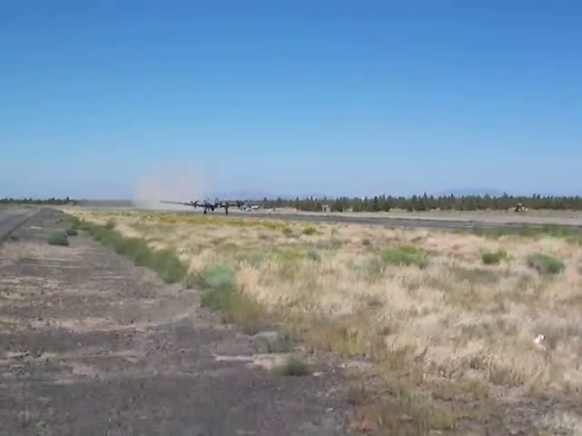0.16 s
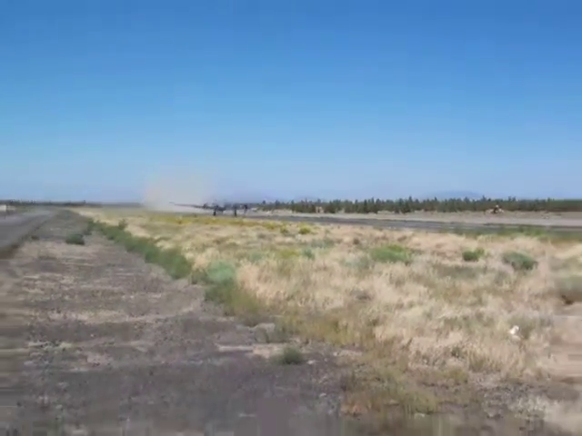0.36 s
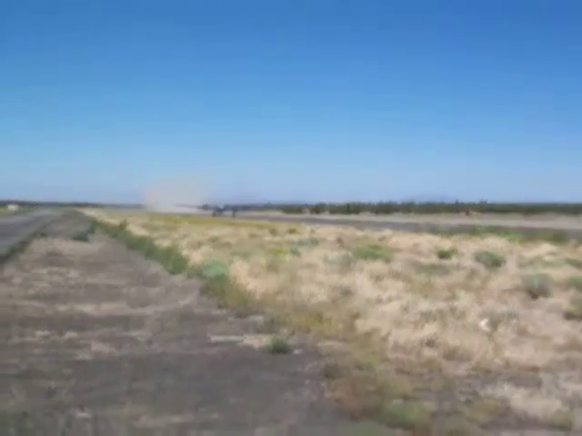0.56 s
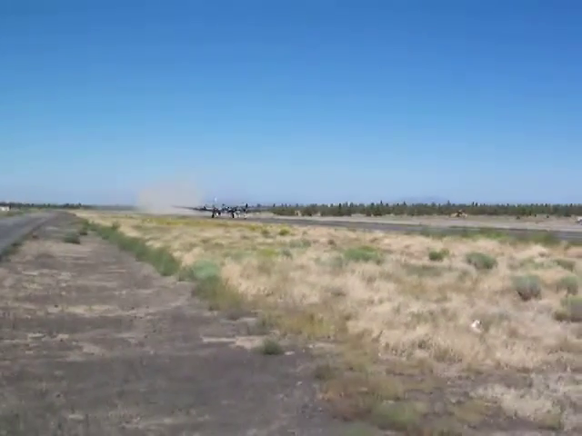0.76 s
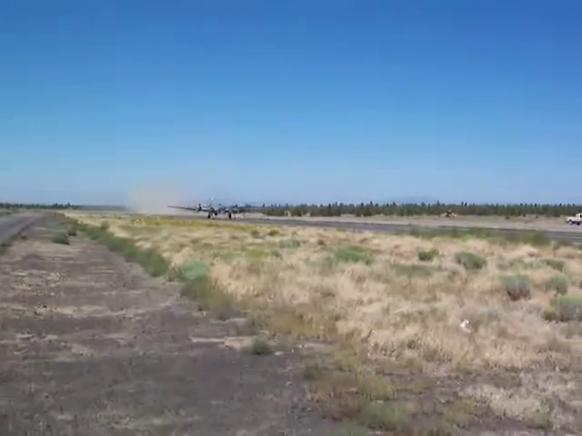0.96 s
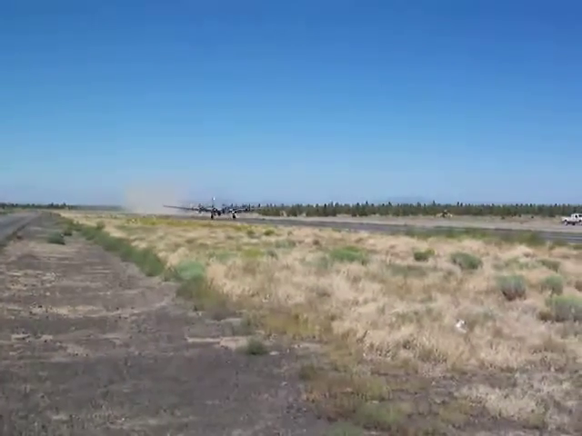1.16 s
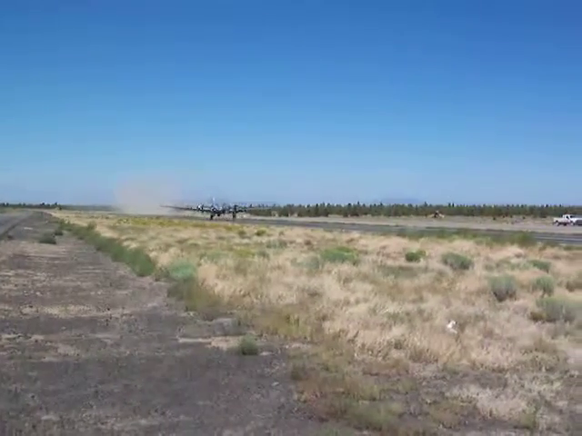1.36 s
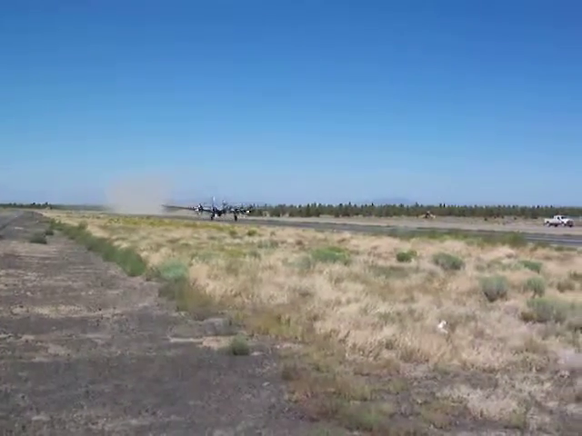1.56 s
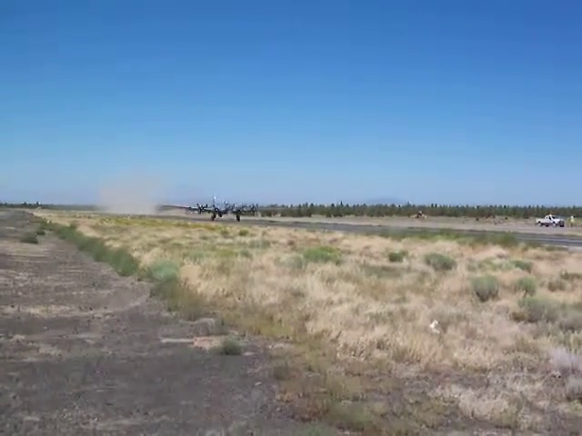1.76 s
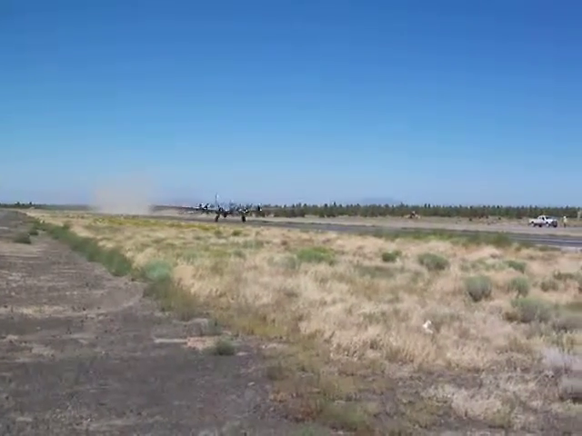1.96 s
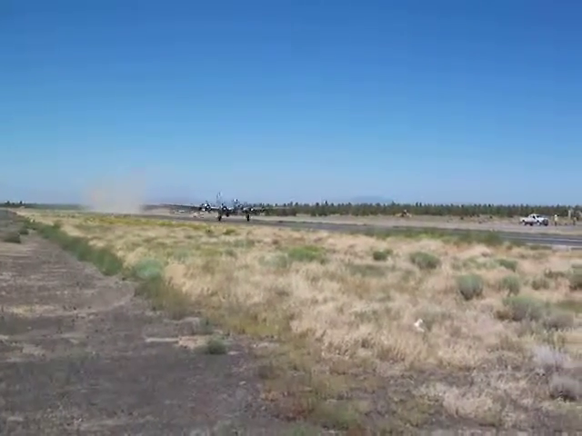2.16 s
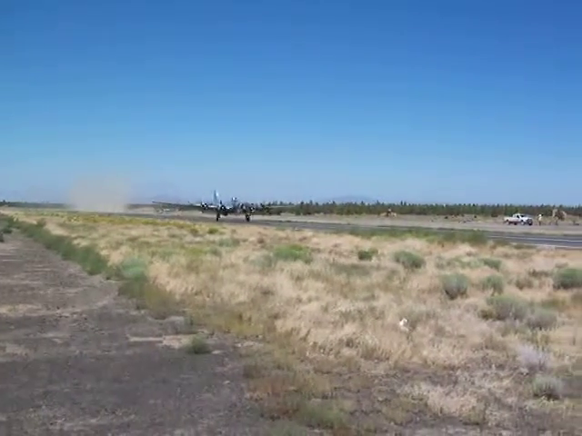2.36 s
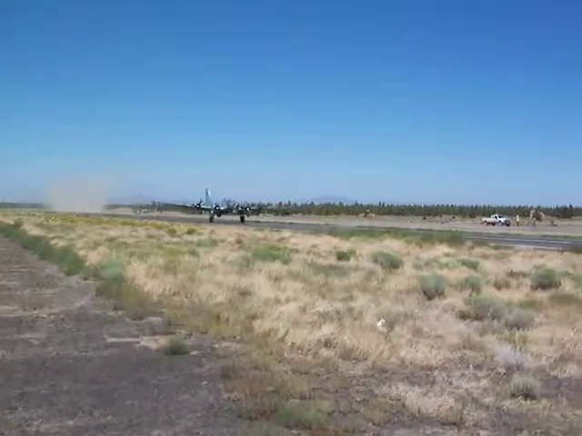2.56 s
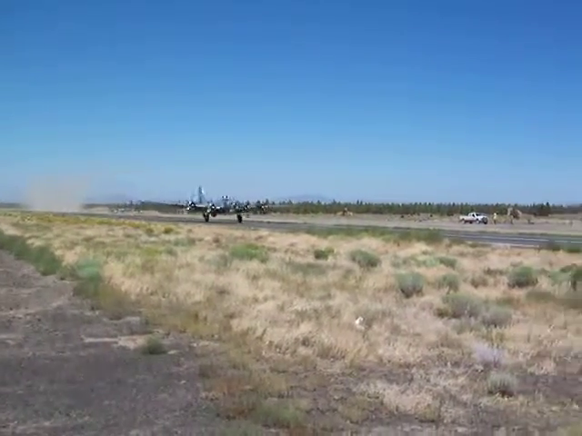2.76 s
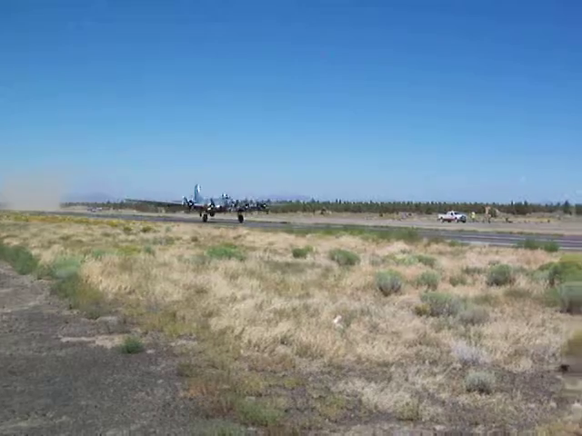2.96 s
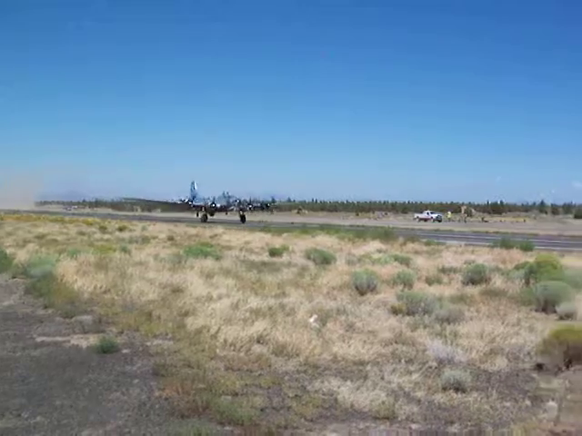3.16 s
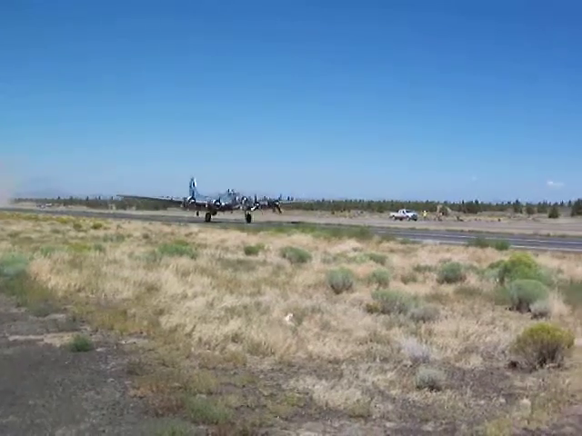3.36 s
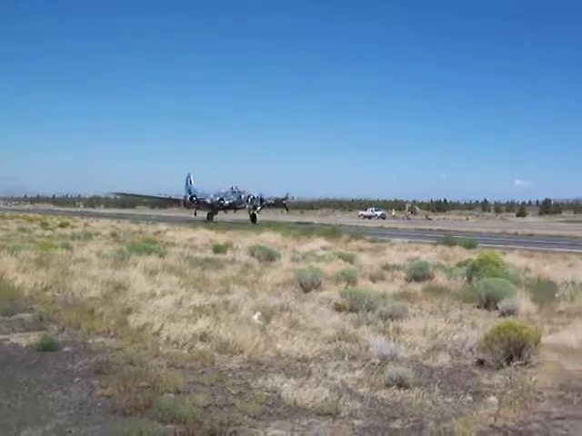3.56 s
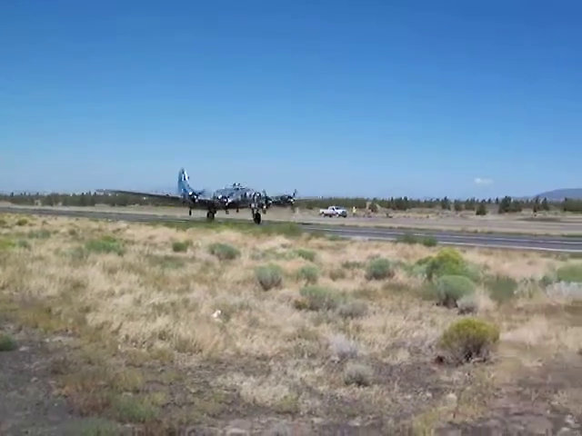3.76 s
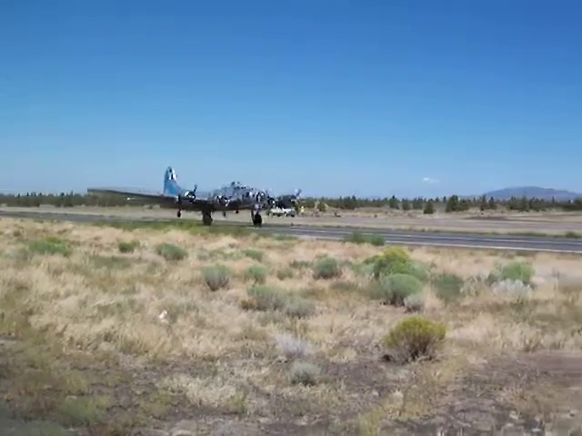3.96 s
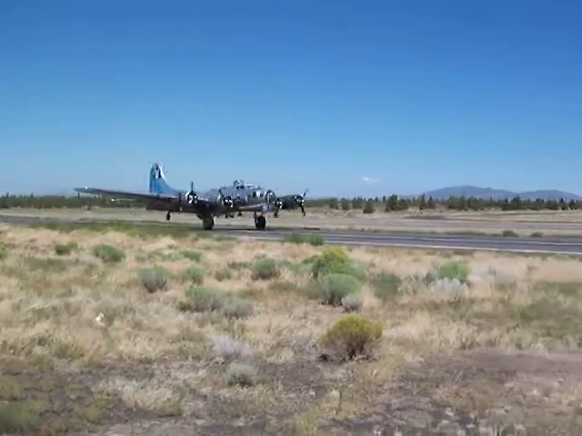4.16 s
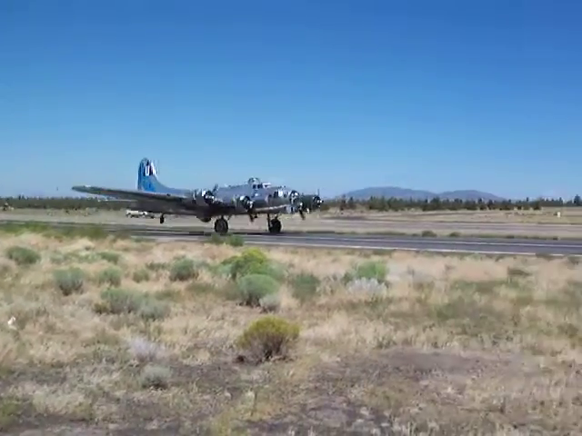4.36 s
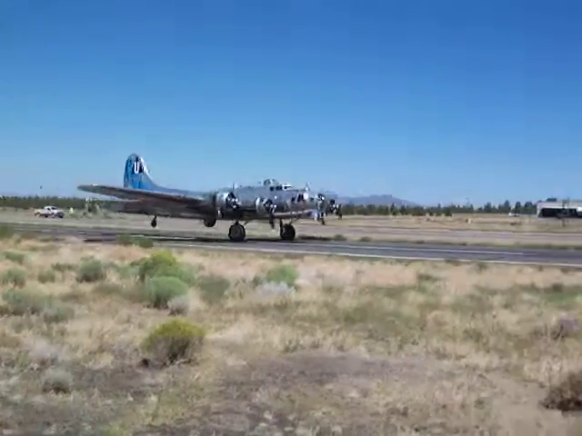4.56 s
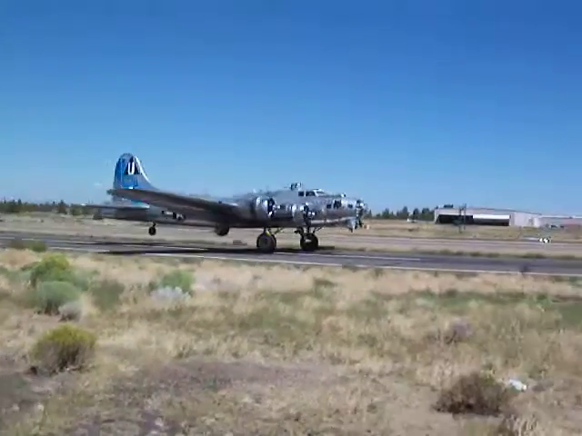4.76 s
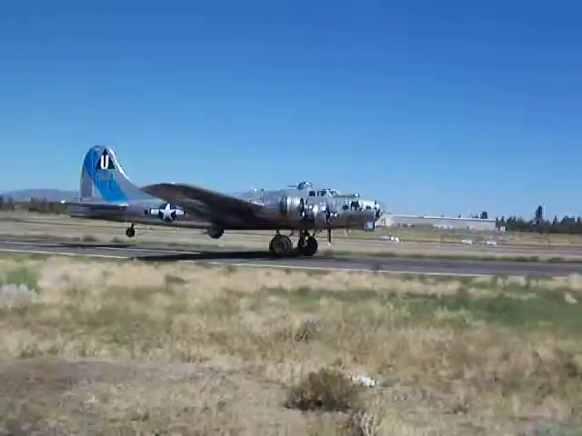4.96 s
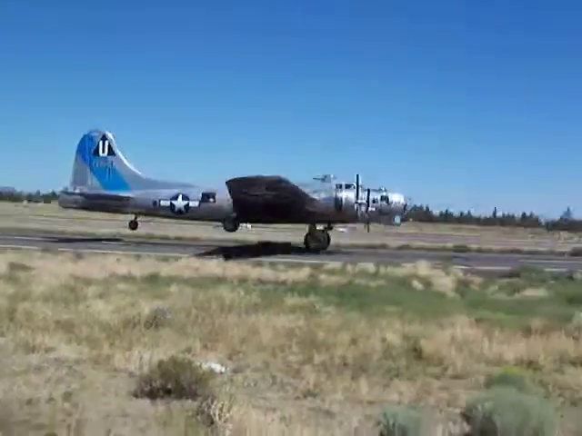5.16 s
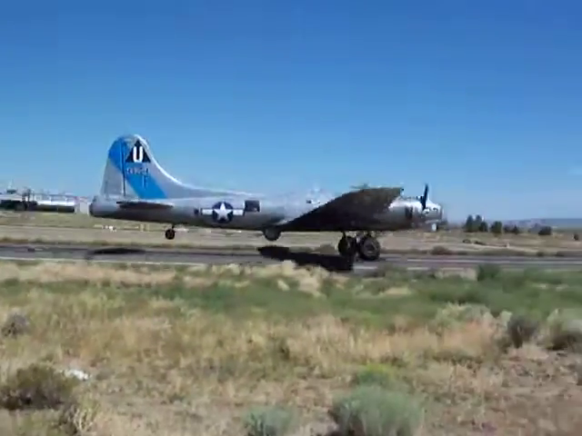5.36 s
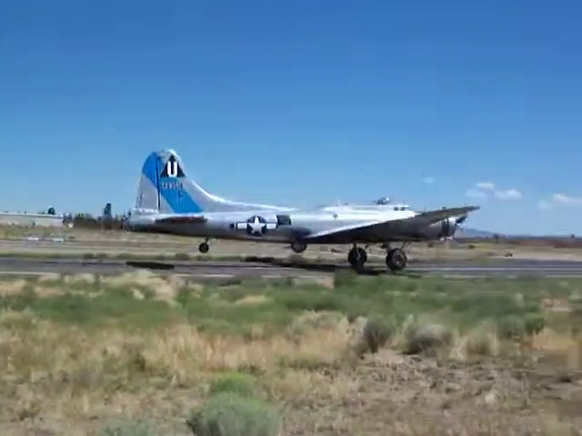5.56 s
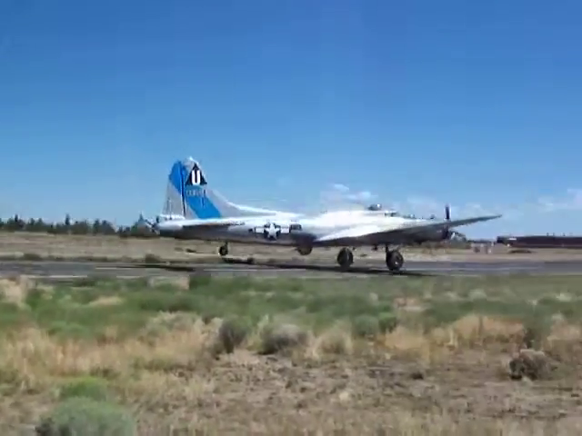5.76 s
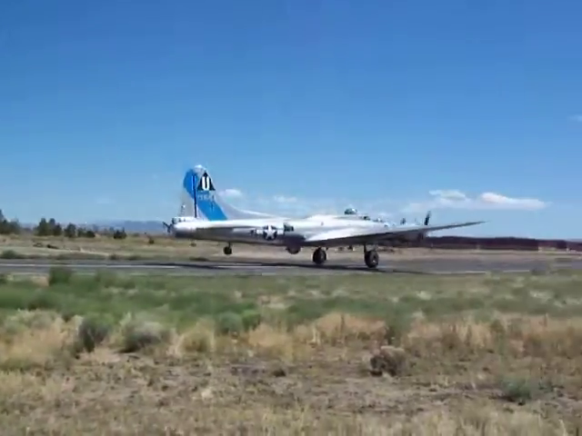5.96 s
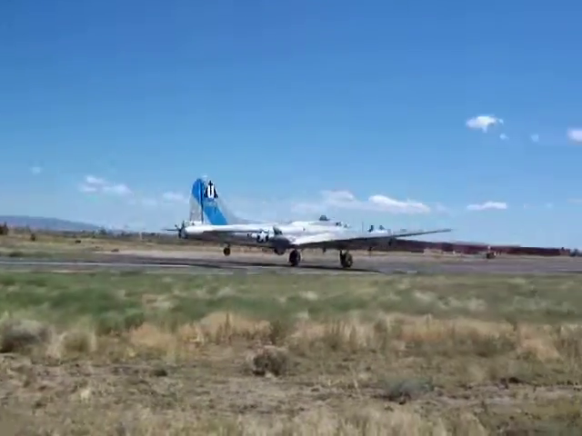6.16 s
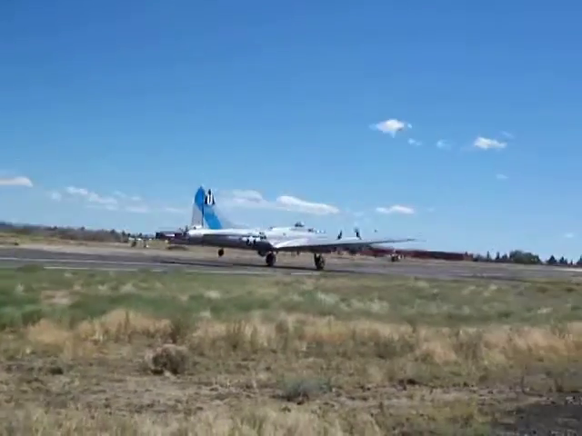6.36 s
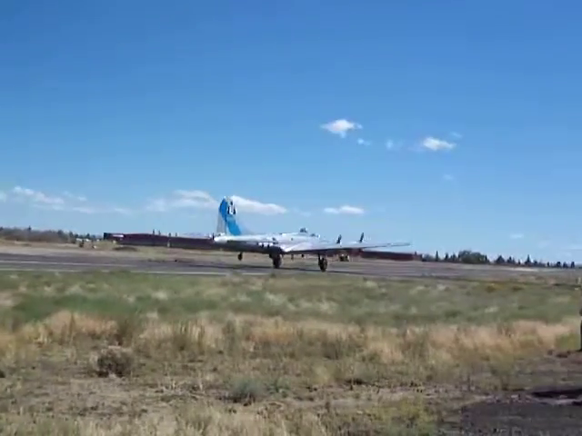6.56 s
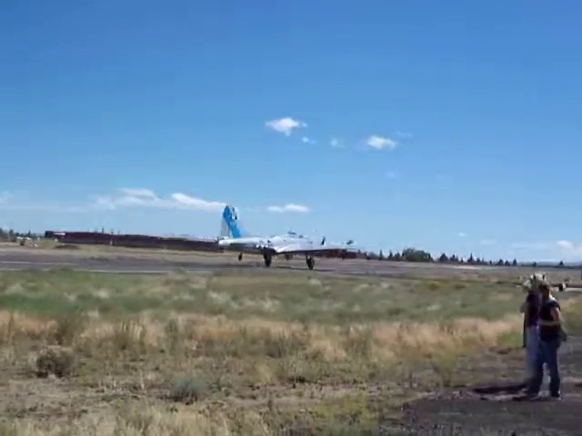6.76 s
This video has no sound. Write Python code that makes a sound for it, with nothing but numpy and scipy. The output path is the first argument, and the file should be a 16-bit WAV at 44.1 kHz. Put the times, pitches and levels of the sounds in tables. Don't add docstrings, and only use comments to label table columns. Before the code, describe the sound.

Wind buffets a small microphone while a four-engine propeller plane drones nearer on a runway, roars past close, pops its exhaust and recedes, pitch dropping.

```python
import sys
import numpy as np
from scipy import signal
from scipy.fft import rfft, irfft, next_fast_len
from scipy.io import wavfile
from scipy.ndimage import uniform_filter1d, map_coordinates

SR = 44100
rng = np.random.default_rng(int(sys.argv[2]) if len(sys.argv) > 2 else 0)


def dump_mix(stems):
    frames = np.atleast_2d(stems).T
    limited = np.clip(frames, -1, 1)
    pcm = np.round(limited * 32767).astype(np.int16)
    wavfile.write(sys.argv[1], SR, pcm)


def amplitude_ratio(level_db):
    exponent = np.asarray(level_db, float) / 20
    return 10 ** exponent


N = 300042
T = np.arange(N) / SR
COARSE = T[::32]

# start in seconds, peak in dB, sharpness in dB.
SNAPS = [(.034, -17.5, -16.5), (0.095, -16, -22.5), (.161, -20, -12.5), (.244, -19, -14),
         (0.291, -24, -13.5), (0.364, -20, -19), (.407, -16, -17), (.832, -20.5, -24), (.896, -23, -13),
         (1.203, -16, -19), (1.265, -13, -17), (1.393, -12, -16.5), (1.494, -26, -18), (1.629, -11, -22.5),
         (1.751, -18.5, -18), (1.785, -12, -23.5), (1.814, -16, -19), (1.896, -8, -20.5),
         (2.035, -12, -20.5), (2.1, -8, -25), (2.201, -17, -17), (2.222, -15, -16.5), (2.287, -9.5, -13),
         (2.844, -17, -12), (2.719, -12, -19.5), (2.745, -12.5, -11), (2.771, -15, -22),
         (3.019, -15.5, -21), (3.193, -9, -14.5), (3.286, -9, -33)]


def unit(x):
    return x / np.sqrt(np.mean(x ** 2) + 1e-20)


def curves(rows):
    s, *cols = np.transpose(rows)
    return [np.interp(T, s, c) for c in cols]


def swells(rows):
    gain = sum(amplitude_ratio(db) * np.exp(-np.abs((COARSE - s) / half) ** 3) for s, db, half in rows)
    return np.interp(T, COARSE, gain)


def wobble(rate):
    return map_coordinates(rng.standard_normal(int(N * rate / SR) + 4), [T * rate])


def filtered(x, response):
    m = next_fast_len(N + 8192)
    return irfft(rfft(x, m) * response(np.fft.rfftfreq(m, 1 / SR) + 1), m)[..., :N]


def coloured(x, spectrum):
    f, db = np.transpose(spectrum)
    return filtered(x, lambda hz: amplitude_ratio(np.interp(np.log(hz), np.log(f), db)))


def evened(x, size):
    power = np.abs(uniform_filter1d(x ** 2, size=size))
    return unit(x / np.sqrt(power + 1e-9 * np.mean(x ** 2)))


def patchy(patchy_db):
    z = signal.stft(rng.standard_normal(N), nperseg=512)[2]
    field = uniform_filter1d(uniform_filter1d(rng.standard_normal(z.shape), 6, 0), 10, 1)
    return signal.istft(z * amplitude_ratio(patchy_db * unit(field)), nperseg=512)[1][:N]


def tone(turns):
    return np.sqrt(2) * np.sin(2 * np.pi * (turns + rng.random()))


def wind():
    # time in seconds, level in dB.
    gusts = [(0, -31.5), (.25, -35), (.65, -35), (.93, -30), (1.2, -29), (1.46, -27), (1.65, -27),
             (2.25, -25.5), (2.45, -24.5), (2.54, -32.5), (2.75, -26.5), (3.35, -25), (4.26, -31),
             (4.35, -41), (5.1, -40), (5.87, -35.5), (6.19, -29.5), (6.8, -57.5)]
    # time in seconds, gain in dB.
    shelter = [(0, 0), (2.42, -1), (2.5, -6), (3.5, -7), (3.6, -17.5), (3.85, -4.5), (4.4, -7), (4.6, -12),
               (6.8, -20.5)]
    # frequency in Hz, density in dB per Hz.
    buffet_spectrum = [(12, -21), (24, 8.5), (50, 4.5), (90, -2), (170, -6), (300, -18), (600, -64)]
    # frequency in Hz, gain in dB.
    port = [(40, -22), (120, -5.5), (300, 2), (900, -5.5), (1400, -15), (2000, -18), (3000, -24),
            (5000, -58.5)]
    # centre in seconds, peak in dB, half length in seconds.
    lumps = [(1.3, -23.5, 0.16), (1.62, -23.5, 0.019), (2.08, -20.5, 0.021), (2.32, -18, 0.051),
             (2.6, -18.5, 0.043), (2.69, -16, 0.017), (3.05, -23, 0.19), (3.28, -18.5, 0.041)]
    # centre in seconds, peak over the strength in dB, half length in seconds.
    flurry_rows = [(.05, -1.5, 0.071), (.48, 1.5, 0.095), (.72, 1, 0.053), (.83, -0.5, 0.063),
                   (1.16, 0.5, 0.034), (1.27, -12, 0.0086), (1.54, -4, 0.022), (1.86, 1, 0.035),
                   (2.1, -7, 0.025), (2.26, -14, 0.026), (2.43, -5, 0.0067), (2.61, 0, 0.017),
                   (2.75, -0.5, 0.039), (2.85, -4, 0.033), (3.2, 0.5, 0.019), (3.3, 0, 0.021),
                   (3.43, 0, 0.018)]
    # centre in seconds, share removed in dB, half length in seconds.
    calms = [
        (.875, -4, 0.011),
        (1.475, 0, 0.021),
    ]
    # rise in seconds, rate per second, level in dB.
    eddy_sizes = [
        (.00018, 480, -2),
        (.0005, 190, -7),
        (.0013, 220, 3),
    ]
    flutter_db, thud_db = -2.5, 2.5
    thuds_follow = 0.25

    strength_db, = curves(gusts)
    shelter_db, = curves(shelter)
    base, flurries = amplitude_ratio(shelter_db), swells(flurry_rows)
    exposed = np.clip(1 - swells(calms), 0, 1)
    buffet = evened(coloured(rng.standard_normal(N), buffet_spectrum), size=6000)

    bunches = amplitude_ratio(3.1 * wobble(90))
    pushes = []
    for rise, rate, db in eddy_sizes:
        hits = (rng.random(N) < rate / SR) * rng.laplace(size=N) * bunches
        pushes.append(filtered(hits, lambda hz: amplitude_ratio(db) / rise / (1 + 2j * np.pi * hz * rise) ** 2))
    small, medium, large = pushes
    flutter = evened(coloured(small + medium, port), size=3500)
    thuds = evened(coloured(large, port), size=4000)

    low = (amplitude_ratio(strength_db + 2.0) + swells(lumps)) * buffet
    fluttering = amplitude_ratio(flutter_db) * (base + flurries) * lulls() * flutter
    thudding = amplitude_ratio(thud_db) * (base + thuds_follow * flurries) * thuds
    return low + amplitude_ratio(strength_db) * exposed * (fluttering + thudding) + snaps()


def lulls():
    db = 0
    for s, *_ in SNAPS:
        follow = 2.0 * np.exp(-((COARSE - s - .008) / .012) ** 2)
        gather = 9 * np.exp(-((COARSE - s + 0.011) / .004) ** 2)
        db = db + follow - gather
    return np.interp(T, COARSE, amplitude_ratio(db))


def snaps():
    # start in seconds, peak in dB.
    ticks = [
        (0.0503, -31),
        (0.0953, -56),
    ]
    out, t = np.zeros(N + SR), np.arange(500) / SR
    draws = rng.random((len(SNAPS), 3))
    for (s, db, sharp_db), (a, b, c) in zip(SNAPS, draws):
        hz = 750 * amplitude_ratio(.5 * (sharp_db + 16.0)) * (0.94 + 0.35 * a)
        u = t * hz / (0.18 + 0.36 * b)
        swing = u ** 2 * np.exp(-u) * np.sin(2 * np.pi * hz * t / (1 + 150 * t))
        out[round(s * SR) + 30:][:len(t)] += amplitude_ratio(db + 7.0) * np.sign(c - .5) * swing
    out = filtered(out[:N], lambda hz: 1 / (1 + (hz / 2100) ** 5))
    for s, db in ticks:
        out[round(s * SR) + 40:][:2] += amplitude_ratio(db + 23) * np.array([1, -.6])
    return out


def flight():
    blade_hz, speed_m_s, nearest_m, pass_s = 71.3, 46.0, 31.0, 5.2
    sound_m_s = 343
    along = speed_m_s * (T - pass_s)
    metres = np.hypot(along, nearest_m)
    aft = along / metres
    turns = np.cumsum(blade_hz / (1 + aft * speed_m_s / sound_m_s)) / SR
    return metres, 20 * np.log10(nearest_m / metres), aft, turns


def propellers(spread_db, aft, turns):
    # centre in seconds, multiple of blade rate, peak in dB, half length in seconds.
    beats = [(1.19, 1, -28, 0.16), (2.063, 1, -26.5, 0.25), (2.782, 1, -29.5, 0.39), (3.453, 1, -19, 0.052),
             (3.744, 1, -23, .17), (4.233, 1, -20, 0.19), (4.796, 1, -20, 0.15), (5.614, 1, -23.5, 0.32),
             (6.017, 1, -37.5, 0.056), (6.27, 1, -37, 0.14), (1.655, 2, -30.5, 0.23),
             (2.88, 2, -28.5, 0.36), (3.387, 2, -27, 0.046), (3.628, 2, -30.5, 0.034),
             (3.84, 2, -25.5, 0.098), (4.013, 2, -23, .05), (4.21, 2, -30, 0.11), (4.594, 2, -21, 0.054),
             (4.77, 2, -28.5, 0.094), (5.138, 2, -18.5, 0.14), (5.425, 2, -28.5, .17),
             (6.034, 2, -28, 0.074), (3.368, 3, -30, 0.084), (3.683, 3, -35.5, 0.069),
             (4.217, 3, -33, 0.18), (4.479, 3, -29, 0.051), (4.672, 3, -29.5, 0.034),
             (4.832, 3, -26.5, 0.032), (4.982, 3, -28.5, 0.059), (5.338, 3, -23, 0.1)]
    further_beats = [(4.93, 4, -35, .13), (5.17, 4, -38, .07), (5.42, 4, -38, .06), (4.88, 5, -39, .07),
                     (5.12, 5, -35, .1), (5.86, 2, -31, .05), (6.3, 2, -36, .05), (6.46, 2, -38, .06),
                     (3.95, 3, -35, .05), (5.75, 3, -37, .12)]
    out_of_step_db = [-30, -34.5, -36]
    upper_db = -44.5 - 8.5 * aft ** 2
    between = [db - 5.4 * aft for db in out_of_step_db] + [upper_db, upper_db]
    gains = []
    for k, db in enumerate(between, start=1):
        rows = [(s, peak, half) for s, n, peak, half in [*beats, *further_beats] if round(n) == k]
        gains.append(amplitude_ratio(db + spread_db + 3.63 * wobble(5)) + swells(rows))
    gains += [amplitude_ratio(-7) * gains[-1], amplitude_ratio(-15.5) * gains[-2]]
    return sum(gain * tone(k * (turns + 0.008 * wobble(12))) for k, gain in enumerate(gains, start=1))


def engines(metres, spread_db, aft, turns):
    detune = [-.008, -.003, .003, .009]
    cycle = 8 / 27
    cycles = [cycle * turns * (1 + d) + 0.0068 * wobble(12) + rng.random() for d in detune]
    roaring = roar(metres, aft, cycles) + pops()
    echo = filtered(roaring, lambda hz: np.exp(-2j * np.pi * hz * .00163) / (1 + (hz / 2700) ** 4))
    echoing = (0.21 + 0.13 * aft) * echo
    return drone(spread_db, aft, cycles) + wash(spread_db, aft) + roaring + echoing + whines()


def drone(spread_db, aft, cycles):
    # multiple of the engine cycle, level in dB.
    exhaust = [(2, -6.5), (3, -5.5), (4, -3.5), (5, -3), (6, -3), (7, -6.5), (8, -11.5), (9, -5.5),
               (11, -10), (12, -13), (14, -11.5), (18, -26.5)]
    tones = sum(amplitude_ratio(db - 7.5) * tone(k * c) for k, db in exhaust for c in cycles)
    return amplitude_ratio(-30 + spread_db - 6.0 * aft) * tones


def wash(spread_db, aft):
    # frequency in Hz, density in dB per Hz.
    rumble = [(30, -9.5), (100, -3), (220, 1.5), (350, -6.5), (500, -15), (800, -48)]
    return amplitude_ratio(-34.5 + spread_db - 3 * aft) * unit(coloured(patchy(patchy_db=3.0), rumble))


def roar(metres, aft, cycles):
    # time in seconds, level in dB.
    loudness = [(0.0, -49.5), (0.13, -61), (1.31, -49.5), (1.48, -51.5), (1.89, -46.5), (2.69, -45.5),
                (3.26, -38), (3.39, -39.5), (3.69, -34.5), (4.2, -27), (4.37, -33), (4.45, -29),
                (5.68, -30), (5.81, -36), (5.85, -34.5), (6.02, -44), (6.72, -57.5), (6.8, -57.5)]
    # frequency in Hz, density in dB per Hz.
    hiss = [(200, -9.5), (400, -15), (700, -10), (2050, -13.5), (2700, -9.5), (3500, -13.5), (6780, -18.5),
            (7600, -22.5)]
    # centre in seconds, peak in dB, half length in seconds.
    rasps = [
        (3.96, -8, 0.11),
        (4.178, -10, 0.063),
        (5.56, -4, 0.076),
    ]
    # centre in seconds, share removed in dB, half length in seconds.
    shadows = [
        (4.35, -20, 0.033),
        (5.8, -10, 0.025),
        (5.92, -14, .015),
    ]
    roar_db, = curves(loudness)
    bright_db = -2.5 - 0.17 * metres + 0.5 * aft
    body_db = -5.5 - 0.15 * (roar_db - roar_db.max())
    rasp_db = -13 + 1.3 * wobble(8.2)

    puffs = 1 + 0.031 * sum(np.cos(2 * np.pi * 9 * c) for c in cycles)
    rush = coloured(patchy(patchy_db=0.94) * puffs * amplitude_ratio(0.71 * wobble(90)), hiss)

    def below(hz):
        return 1 / (1 + (hz / 1900) ** 6)

    def above(hz):
        return 1 / (1 + (4700 / hz) ** 6)

    body = unit(filtered(rush, below))
    bright = unit(filtered(rush, above))
    middle = unit(filtered(rush, lambda hz: 1 - below(hz) - above(hz)))

    def two_bands(hz):
        return 1 / (1 + ((hz - 2680) / 230) ** 2) + .6 / (1 + ((hz - 3120) / 170) ** 4)

    rasp = unit(filtered(patchy(patchy_db=1.5), two_bands))
    mix = (amplitude_ratio(rasp_db) + swells(rasps)) * rasp + middle
    mix = mix + amplitude_ratio(bright_db + 4.9) * bright + amplitude_ratio(body_db + 4.5) * body
    shimmer_db = .55 * (1 + aft) * wobble(25)
    return amplitude_ratio(roar_db + shimmer_db) * np.clip(1 - swells(shadows), 0, 1) * mix


def whines():
    # time in seconds, frequency in Hz, level in dB.
    gear = [(1, 2640, -73), (2.2, 2668, -56.5), (3.58, 2660, -50), (3.65, 2660, -39), (3.88, 2667, -36.5),
            (3.98, 2675, -52), (4.13, 2670, -36), (4.26, 2650, -50), (4.6, 2606, -89)]
    blower = [(0, 3505, -68), (.5, 3515, -68), (.6, 3520, -97)]
    pitches = (curves(gear), curves(blower))
    return sum(amplitude_ratio(db) * tone(np.cumsum(hz) / SR + .04 * wobble(18)) for hz, db in pitches)


def puff():
    s, db, wide, centre_hz, half_hz = (.672, -52.5, .028, 3550, 700)
    band = unit(filtered(rng.standard_normal(N), lambda hz: 1 / (1 + ((hz - centre_hz) / half_hz) ** 4)))
    return amplitude_ratio(db) * np.exp(-((T - s) / wide) ** 4) * band


def pops():
    # start in seconds, peak in dB, half width in seconds.
    bursts = [
        (0.862, -39, 0.0019),
        (5.4996, -12.5, 0.0037),
        (5.6454, -11.5, 0.0031),
        (5.671, -24.5, 0.0047),
        (5.748, -28, 0.0052),
        (5.888, -19, 0.0028),
        (6.041, -27.5, 0.0037),
        (6.1994, -33, 0.004),
    ]
    gain = sum(amplitude_ratio(db - 10.5) * np.exp(-((T - s - .003) / wide) ** 2) for s, db, wide in bursts)
    noise = rng.standard_normal(N)
    return gain * unit(filtered(noise, lambda hz: 1 / (1 + (2600 / hz) ** 4) / (1 + hz / 3000)))


def scene():
    metres, spread_db, aft, turns = flight()
    aircraft = propellers(spread_db, aft, turns) + engines(metres, spread_db, aft, turns)
    return (wind() + aircraft + puff())[None]


def top_cut(x):
    return signal.sosfilt(signal.butter(12, 9030, fs=SR, output="sos"), x)


def record(dry):
    # frequency in Hz, gain in dB.
    lowpass = [(20, -1.5), (6900, -2), (7600, -4), (8200, -13), (8700, -23), (9000, -35.5), (9250, -74),
               (9500, -140)]
    rounded = dry / (1 + np.abs(dry / .68) ** 3) ** (1 / 3)
    gritty = rounded + amplitude_ratio(-32.5) * (np.abs(rounded) + .004) * rng.standard_normal(dry.shape)
    return top_cut(coloured(gritty, lowpass))


dry = scene()
out = record(dry)
dump_mix(out)
```